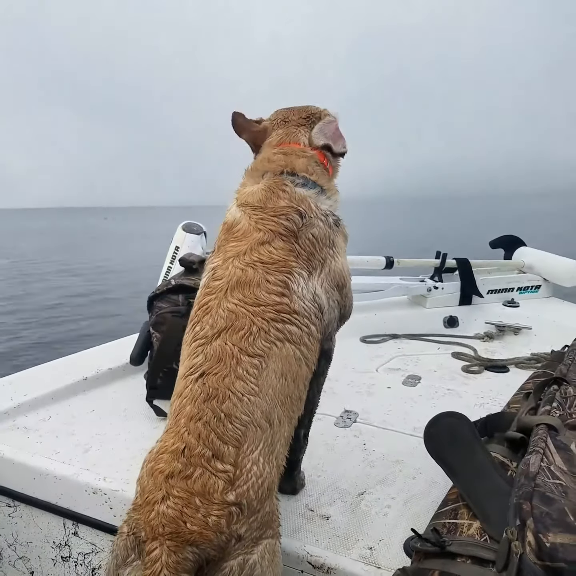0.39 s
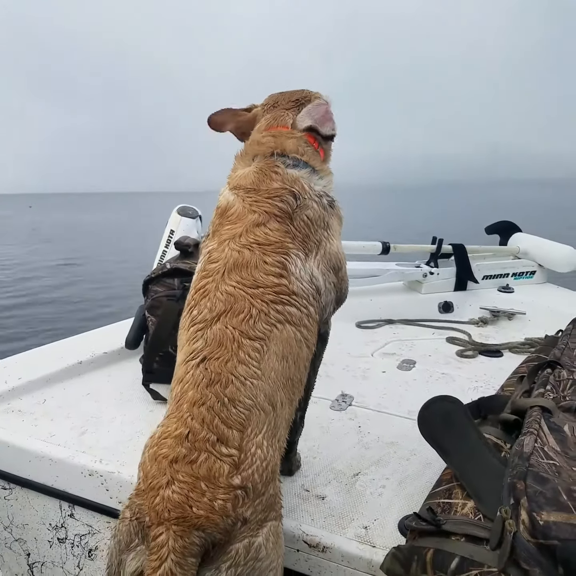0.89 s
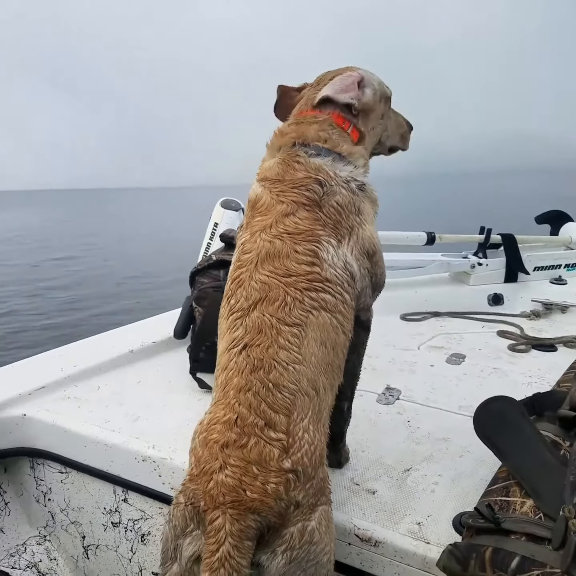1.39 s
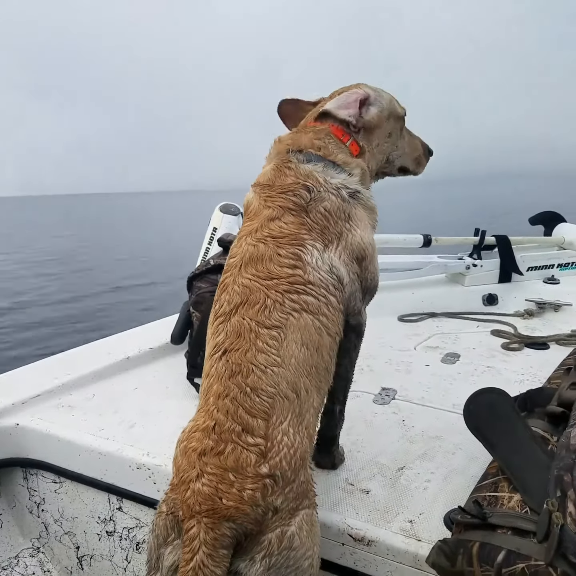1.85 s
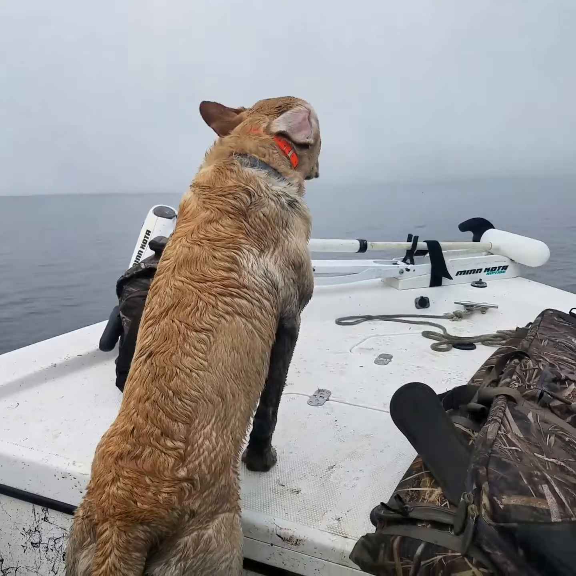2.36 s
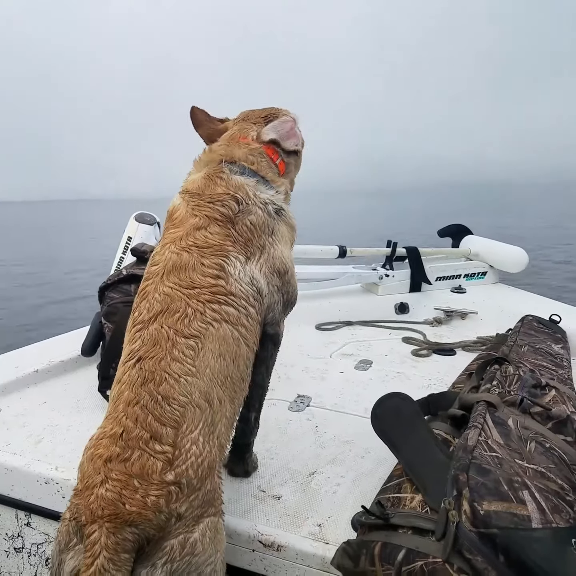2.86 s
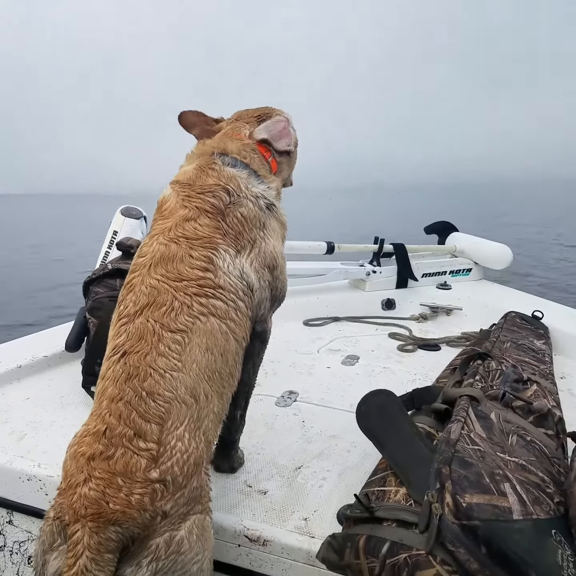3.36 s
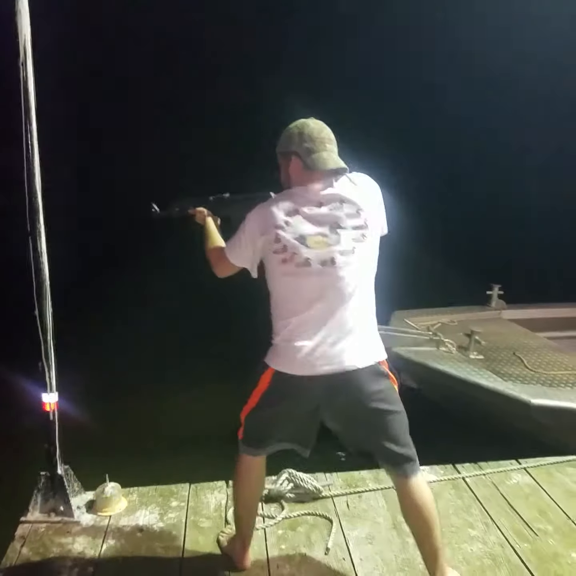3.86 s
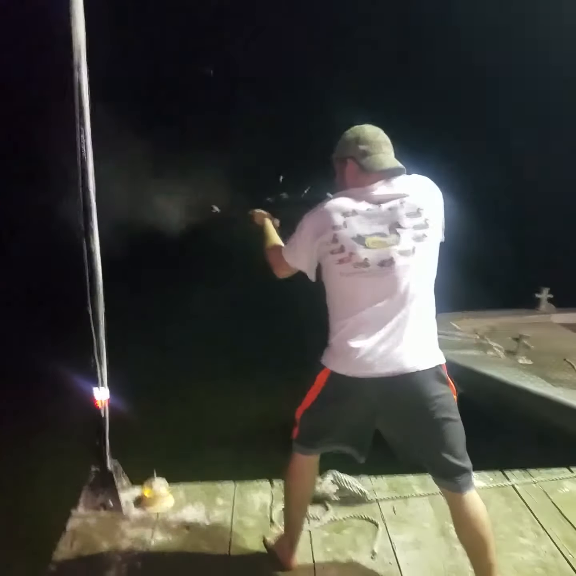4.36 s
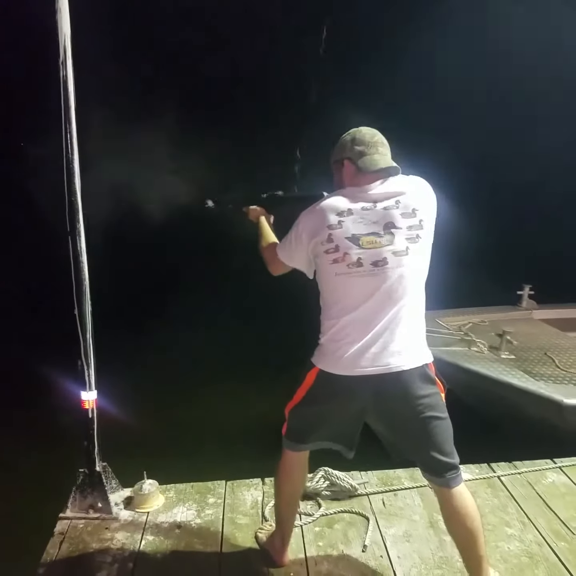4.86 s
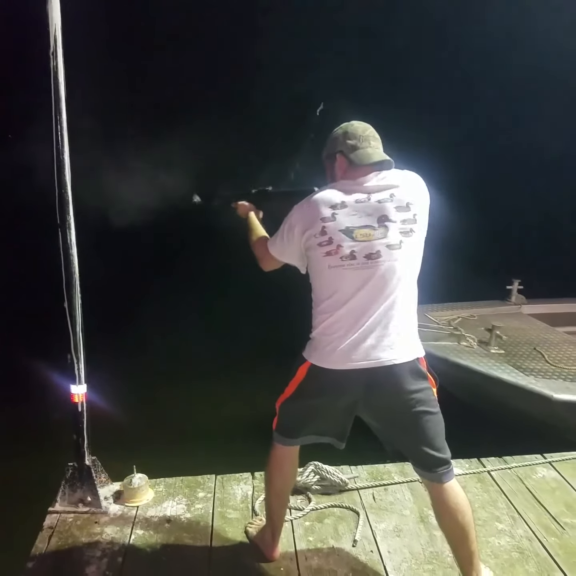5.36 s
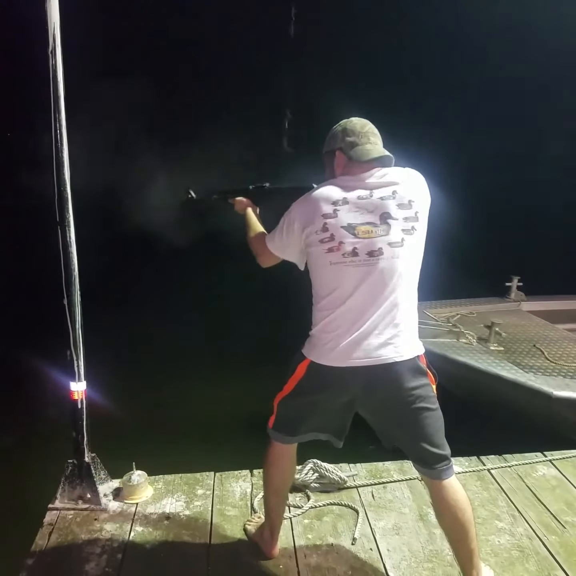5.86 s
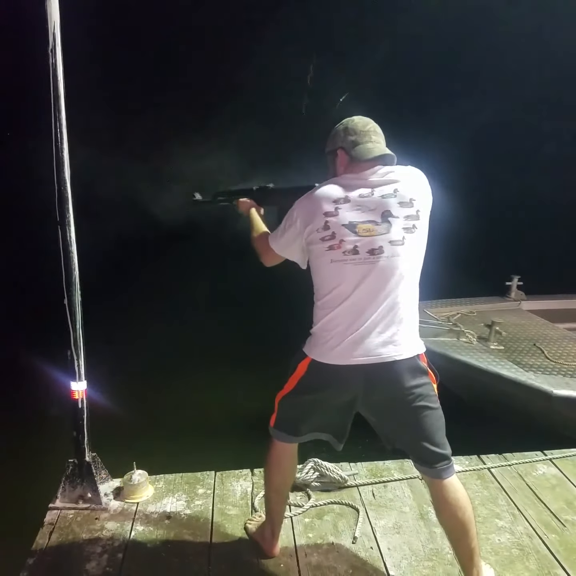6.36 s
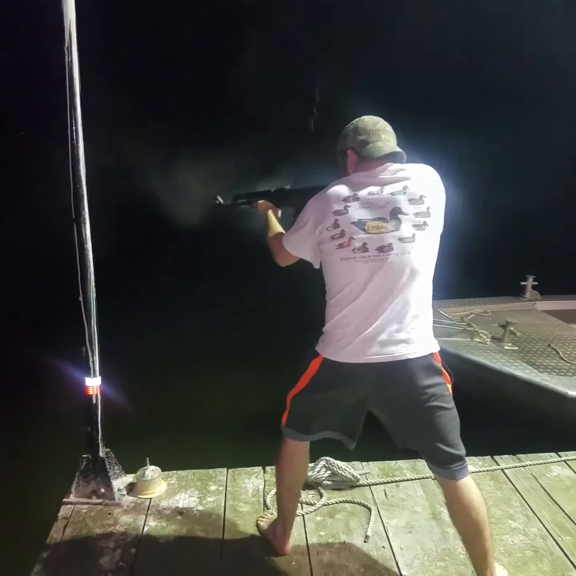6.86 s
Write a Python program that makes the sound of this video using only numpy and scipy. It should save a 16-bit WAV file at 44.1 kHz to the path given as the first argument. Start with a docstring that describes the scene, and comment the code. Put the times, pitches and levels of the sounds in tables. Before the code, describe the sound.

Strong wind roars and buffets the microphone on a boat, cuts to near silence, then an automatic rifle fires a long, loud, overloaded burst.

```python
"""Wind tears past the two microphone ports of a small camera on a fast open boat: gusts, lulls and buffets of
coloured noise kicks, and ringing slaps. Apart from the wind, band noise near 11 kHz goes on and off. A cut to
silence; then, on a dock at night, a light breeze puffs (sparse bass kicks), with faint tones and ticks, until an
automatic rifle fires about ten shots a second: harsh noise bursts in seven bands, ringing clatter of the action,
low ringing thumps, and noise echoes that thicken to a roar over a low rumble."""
import sys
import numpy as np
from scipy import signal
from scipy.fft import rfft, irfft
from scipy.io import wavfile
from scipy.ndimage import uniform_filter1d

SR = 44100
rng = np.random.default_rng(int(sys.argv[2]) if len(sys.argv) > 2 else 0)


def convert_level_to_amplitude(level_db):
    """Map a level in decibels to its linear amplitude factor."""
    exponent = np.asarray(level_db, float) / 20
    return 10 ** exponent


def dump(signal):
    """Clip the signal to [-1, 1] and save it as 16-bit WAV at the path in sys.argv[1]."""
    limited = np.clip(np.atleast_2d(signal).T, -1, 1)
    pcm = np.round(limited * 32767).astype(np.int16)
    wavfile.write(sys.argv[1], SR, pcm)


N = 308009
T_S = np.arange(N) / SR


def rms_one(x):
    """Scales to rms 1."""
    return x / np.sqrt(np.mean(x ** 2) + 1e-20)


def in_time(rows):
    """Interpolates table columns over time."""
    s, *columns = np.transpose(rows)
    return [np.interp(T_S, s, c) for c in columns]


def lasting(rows):
    """True between the first and last times of a table."""
    return (T_S > rows[0][0]) & (T_S < rows[-1][0])


def left_right(db):
    """Splits a left minus right difference evenly over the ports."""
    return db * np.array([[.5], [-.5]])


def ages(length_s):
    """Time in s since an onset."""
    return np.arange(round(length_s * SR)) / SR


def drift(rate_hz):
    """Two random curves of joint rms 1: noise through a double one-pole lowpass."""
    r = np.exp(-2 * np.pi * rate_hz / SR)
    noise = rng.standard_normal((2, N + 9000))
    return rms_one(signal.lfilter([1], [1, -2 * r, r * r], noise)[:, 9000:])


def colour(x, spectrum, size=4096, unit_power=True):
    """Causal (minimum phase) filter with the given spectrum; with unit_power white noise keeps its power."""
    hz, db = np.transpose(spectrum)
    grid = np.arange(size // 2 + 1) * SR / size
    cepstrum = irfft(np.interp(np.log(grid + 1), np.log(hz), db) * np.log(10) / 20)
    cepstrum[1:size // 2] *= 2
    cepstrum[size // 2 + 1:] = 0
    taps = irfft(np.exp(rfft(cepstrum)))
    if unit_power:
        taps = taps / np.sqrt(np.sum(taps ** 2))
    return signal.oaconvolve(x, taps[None], axes=1)[:, :N]


def band(x, low_hz, high_hz):
    """Butterworth bandpass."""
    return signal.sosfilt(signal.butter(2, [low_hz, high_hz], "band", fs=SR, output="sos"), x)


def highpass(x, order, hz):
    """Butterworth highpass."""
    return signal.sosfilt(signal.butter(order, hz, "high", fs=SR, output="sos"), x)


def spikes(times_s, heights):
    """One-sample clicks over a negligible floor."""
    out = np.zeros(N)
    np.add.at(out, np.minimum((np.asarray(times_s) * SR).astype(int), N - 1), heights)
    return out + 1e-18


def ring(clicks, hz, t60_s):
    """A unit click sets a sine of initial height 1 ringing."""
    r, w = convert_level_to_amplitude(-60 / (t60_s * SR)), 2 * np.pi * hz / SR
    return signal.lfilter([0, np.sin(w)], [1, -2 * r * np.cos(w), r * r], clicks)


def fading(clicks, t60_s):
    """Each click starts an exponential decay."""
    return signal.lfilter([1], [1, -convert_level_to_amplitude(-60 / (t60_s * SR))], clicks)


def late_right(x):
    """The right port hears the same sound slightly later."""
    lag_s = 0.0003
    return np.array([x, np.interp(np.arange(N) - lag_s * SR, np.arange(N), x)])


def eddies(per_s, spread_db, smooth):
    """Pressure kicks of small eddies, unrelated at the two ports, on a share of even noise."""
    strength_db = spread_db * np.minimum(rng.exponential(1, (2, N)), 4)
    kicks = (rng.random((2, N)) < per_s / SR) * convert_level_to_amplitude(strength_db)
    kicks *= rng.choice([-1, 1], (2, N))
    return rms_one(kicks) + smooth * rng.standard_normal((2, N))


def patchy(x, low_hz, high_hz, depth_db, rate_hz, together):
    """Ten narrow bands each waver on their own, at both ports together or apart."""
    out, edges_hz = x, np.geomspace(low_hz, high_hz, 11)
    for low, high in zip(edges_hz, edges_hz[1:]):
        part = signal.sosfilt(signal.butter(1, [low, high], "band", fs=SR, output="sos"), x)
        waver = drift(rate_hz)
        waver = waver[0] if together else waver
        out = out + (convert_level_to_amplitude(depth_db * waver) - 1) * part
    return out


# shots: t/s, relative level/dB
SHOT_ROWS = [(4.167, -2), (4.26, -4), (4.362, -4), (4.464, -6.5), (4.563, -5.5), (4.667, -6), (4.769, -6.5),
             (4.865, -7), (4.96, -5), (5.058, -5.5), (5.156, -7.5), (5.255, -4.5), (5.351, -7.5),
             (5.459, -6), (5.556, -6.5), (5.655, -5), (5.754, -5), (5.85, -5), (5.945, -6), (6.041, -6),
             (6.134, -5), (6.242, -5.5), (6.338, -5), (6.435, -6), (6.532, -6.5), (6.621, -5.5),
             (6.721, -5), (6.818, -4), (6.914, -6)]
# blast noise spectrum: f/Hz, density/dB
BLAST_SPECTRUM = [(25, -38.5), (130, -18.5), (250, -7), (460, -8.5), (700, -3.5), (1100, -11.5),
                  (1600, -7.5), (1950, -1), (2150, -5.5), (2400, -9.5), (3900, -10.5), (4550, -13.5),
                  (5300, -17), (5800, -14), (6400, -17), (11500, -17), (15000, -24.5)]
# blast bands: low f/Hz, high f/Hz, gain/dB, swell time factor, t60/s, relative echo level/dB,
# left-right likeness (power share), burst length/s, drop after burst/dB, first-shot offset/dB
BLAST_BAND_ROWS = [(30.2, 190, -0.5, 0.83, 0.85, -14.5, 0.9, 0.044, 2, 3),
                   (286, 670, 6.5, 4, 1, -11.5, 0.56, 0.045, 6.5, -1),
                   (870, 1834, 6, 1.13, 0.72, -13, 0.22, 0.038, 5.5, 0),
                   (1873, 2905, 6.5, 1.1, 0.41, -13.5, 0.27, 0.041, 0.5, -1.5),
                   (2930, 4560, 7.5, 1.44, 0.29, -11.5, 0.055, 0.036, 0, -1.4),
                   (5020, 7620, 6.5, 1.7, 0.36, -9.5, 0.2, 0.035, 2.2, -1),
                   (7680, 21000, 9, 1, 0.4, -10, 0.012, 0.027, 6, 2.5)]


def blasts():
    """Each shot swells, holds, drops and dies at each band's pace; far echoes of all shots pile into a roar."""
    first_swell_s, swell_s = 0.00074, 0.0095   # the first cracks out of the quiet
    burst_edge_s, echo_t60_s, top_right_db = 0.0014, 6.75, 0.5
    noise = colour(eddies(per_s=2000.0, spread_db=2.5, smooth=0.97), BLAST_SPECTRUM)
    common_noise = colour(rng.standard_normal((1, N)), BLAST_SPECTRUM)[0]
    s, level_db = np.transpose(SHOT_ROWS)
    first = s == s[0]
    swells_s = np.where(first, first_swell_s, swell_s)
    age, out = ages(.6), 0
    for low_hz, high_hz, db, slower, t60_s, echo_db, alike, burst_s, drop_db, first_db in BLAST_BAND_ROWS:
        # power envelopes: dB doubled
        power = np.zeros(N + len(age))
        heights = convert_level_to_amplitude(2 * (level_db + first_db * first))
        drop = drop_db / (1 + np.exp((burst_s - age) / burst_edge_s))
        fall = convert_level_to_amplitude(-120 * age / t60_s - 2 * drop)
        rises_s = np.maximum(swells_s * slower, 1e-4)
        for i, height, rise_s in zip((s * SR).astype(int), heights, rises_s):
            power[i:i + len(age)] += height * (1 - np.exp(-age / rise_s)) ** 2 * fall
        roar = fading(spikes(s, convert_level_to_amplitude(2 * (echo_db - 11))), echo_t60_s / 2)
        roar = uniform_filter1d(roar, size=3000, origin=1499)   # echoes set in gradually
        apart = np.sqrt(1 - alike) * band(noise, low_hz, high_hz)
        shared = np.sqrt(alike) * late_right(band(common_noise, low_hz, high_hz))
        pair = (apart + shared) * convert_level_to_amplitude(left_right(-top_right_db * (low_hz > 7000)))
        flutter_db = 0.2 * drift(30.0)[0] + 1.01 * drift(57.0)
        out = out + convert_level_to_amplitude(db + flutter_db) * np.sqrt(power[:N] + roar) * pair
    return out


# rifle action modes: f/Hz, relative level/dB, t60/s
ACTION_MODE_ROWS = [(1430, -31, .012), (1890, -29, .016), (2150, -27.5, .022), (2320, -32, .018),
                    (2705, -32, .016), (5760, -33, .02)]


def action():
    """After each shot the bolt makes six uneven contacts, striking the modes with varying strengths."""
    delay_s, span_s, chance_db = .01, .04, 3
    s, level_db = np.transpose(SHOT_ROWS)
    times_s = s[:, None] + delay_s + span_s * rng.random((len(s), 6))
    out = np.zeros((2, N))
    for hz, db, t60_s in ACTION_MODE_ROWS:
        per_shot_db = chance_db * rng.standard_normal((len(s), 1))
        for side in out:
            per_contact_db = chance_db * rng.standard_normal(times_s.shape)
            heights = convert_level_to_amplitude(level_db[:, None] + 13.0 + db + per_shot_db + per_contact_db)
            side += ring(spikes(times_s.ravel(), heights.ravel()), hz, t60_s)
    return out


def dips():
    """Gain: the roar sags just before each later shot, less as the echoes thicken."""
    half_s, depth_db, fill_s = 0.017, 3.5, 2.4
    s = np.transpose(SHOT_ROWS)[0]
    dip_db = depth_db * np.exp(-(s[1:] - s[0]) / fill_s)
    shape = np.hanning(round(2 * half_s * SR))
    return convert_level_to_amplitude(-np.convolve(spikes(s[1:] - 2.0 * half_s, dip_db), shape)[:N])


# low thumps: t/s, relative ring level/dB, relative push level/dB
THUMP_ROWS = [(4.2278, -9, -2), (4.3131, -5, 3.5), (4.5291, -3.5, -40), (4.6463, -6, -13),
              (4.738, -11, -35), (4.8392, -10, -39), (4.851, -16, -38), (4.953, -7.5, -37),
              (5.048, -14.5, -5), (5.1373, -9.5, -2.5), (5.2304, -10.5, -36), (5.3366, -8, -36),
              (5.4347, -8, -11), (5.5327, -5.5, -4), (5.632, -25.5, 0.5), (5.7498, -12, -12),
              (5.8232, -7, 4), (5.8402, -15, -28), (5.916, -22, -5), (5.9366, -8.5, -27), (6.022, -14, -16),
              (6.0292, -11.5, -26), (6.1165, -20, -30), (6.1202, -6.5, -39), (6.2265, -40, -1),
              (6.3116, -33, -4), (6.328, -11, -5), (6.3706, -16, -7), (6.4006, -11.5, -3),
              (6.4222, -8.5, -22), (6.5013, -39, -4.5), (6.5223, -9, -18), (6.602, -6.5, -2),
              (6.614, -13.5, -9), (6.686, -9.5, 2.5), (6.775, -27, 1), (6.7945, -10.5, -31),
              (6.8514, -16.5, -38.5), (6.8714, -15.5, -1), (6.889, -10.5, -31)]
# thump modes: nominal f/Hz, left gain/dB, right gain/dB, t60/s
THUMP_MODE_ROWS = [(482, 11, 10.5, 0.025), (311, -10, -2, 0.043), (776, -1, 1, 0.016), (1500, 2, 4, 0.0071)]


def thumps():
    """A soft pressure step rings modes of varying strength and pitch, and pushes a lower, slower swing."""
    push_hz, push_t60_s, rise_s = 204, 0.021, 0.00033
    pitch_spread, chance_db = .08, 1.5   # pitch_spread: log frequency
    after_db, after_t60_s, after_width_hz = -6.5, 0.13, 225
    s, ring_db, push_db = np.transpose(THUMP_ROWS)
    chance = rng.standard_normal((len(s), len(THUMP_MODE_ROWS) + 1))
    shifts = chance[:, -1]
    out = late_right(ring(spikes(s, convert_level_to_amplitude(push_db)), push_hz, push_t60_s))
    step = np.hanning(round(0.00074 * SR))   # the step takes a moment
    age = ages(.1)
    for (hz, left_db, right_db, t60_s), extra in zip(THUMP_MODE_ROWS, chance.T):
        rings = np.zeros(N + len(age))
        for i, db, shift in zip((s * SR).astype(int), ring_db + chance_db * extra, shifts):
            shape = (1 - np.exp(-age / rise_s)) * convert_level_to_amplitude(db - 60 * age / t60_s)
            shifted_hz = hz * np.exp(pitch_spread * shift)
            rings[i:i + len(age)] += np.sign(shift) * shape * np.sin(2 * np.pi * shifted_hz * age)
        softened = np.convolve(rings, step / step.sum())[:N]
        out += late_right(softened) * convert_level_to_amplitude([[left_db], [right_db]])
    # near echoes keep the main mode sounding
    fade = fading(spikes(s + 0.0049, convert_level_to_amplitude(ring_db + after_db)), after_t60_s)
    hz = THUMP_MODE_ROWS[0][0]
    echo_noise = band(rng.standard_normal(N), hz - after_width_hz / 2, hz + after_width_hz / 2)
    out += late_right(fade * rms_one(echo_noise))
    return highpass(out, 2, 110.0)


def ducking(thump, depth, release_s):
    """Gain control: falls as the smoothed thump level rises, then recovers."""
    r = np.exp(-1 / (release_s * SR))
    level = signal.lfilter([1 - r], [1, -r], np.abs(thump).mean(axis=0))
    return 1 / (1 + depth * level)


# lulls: half-recovered t/s, length/s, depth/dB, left extra fall minus right/dB
LULL_ROWS = [(0.183, 0.034, 4.5, -3), (0.462, 0.027, 7.5, 14), (0.654, 0.03, 5.5, 4), (0.749, 0.025, 9, 6),
             (0.955, 0.13, 4, 1.5), (1.082, 0.047, 12.5, 9), (1.186, 0.023, 3.5, 9),
             (1.401, 0.025, 7.5, -6), (1.519, 0.087, 5.5, 0), (1.636, 0.069, 7, -0.5),
             (1.79, 0.038, 8.5, -13), (1.848, 0.021, 17, 8), (1.955, 0.049, 13.5, 10), (2.031, 0.027, 9, 1),
             (2.152, 0.044, 10, 6), (2.212, 0.037, 8.5, 2), (2.375, 0.1, 11.5, 11.5), (2.409, 0.021, 23, 3),
             (2.641, 0.046, 7.5, 3), (2.803, 0.11, 10.5, 12.5), (2.877, 0.045, 13, 22.5),
             (2.981, 0.047, 10, 9.5), (3.06, 0.041, 10.5, 10), (3.143, 0.033, 12.5, 16),
             (3.237, 0.044, 13, 14), (3.308, 0.015, 4.5, -5), (3.4, 0.055, 1.5, 7.5),
             (3.551, 0.033, 8.5, 11), (3.632, 0.038, 15.5, 12)]


def lulls():
    """Loss in dB at each port: the wind sinks away, stays low and comes back fast."""
    sink_share, return_s = 0.35, 0.017
    loss_db = np.zeros((2, N))
    for end_s, length_s, depth_db, left_db in LULL_ROWS:
        sink = (T_S - end_s + length_s) / (length_s * sink_share)
        shape = np.clip(np.minimum(sink, (end_s - T_S) / return_s + .5), 0, 1)
        loss_db += shape * (depth_db + left_right(left_db))
    return loss_db


# wind between lulls: t/s, relative level/dB, left minus right/dB, treble re level/dB
WIND_ROWS = [(0.0, -17, 3.5, -16), (0.5, -19, -1.5, -15), (1.0, -15.5, 5.5, -15.5), (1.5, -15, 3, -19.5),
             (2.0, -17, 1.5, -14.5), (2.5, -14.5, 1.5, -16.5), (2.95, -15, 4.5, -15.5),
             (3.3, -19, 1, -23.5), (3.6, -18, 3, -21), (3.86, -18.5, 6.5, -20.5)]
# buffets: t/s, relative level/dB, left minus right/dB, treble re level/dB
BUFFET_ROWS = [(0.104, -24.5, -5, -3), (0.193, -23.5, -6, 2), (0.268, -20, -5, -10),
               (0.322, -12.5, 4, -9.5), (0.397, -11.5, 5, -18), (0.52, -14, 6, -23),
               (0.585, -7.5, -1, -16.4), (0.675, -14, 10, -17), (0.791, -11, -7, -21),
               (0.975, -13.5, 11, -9.5), (1.021, -16, -1, -39), (1.083, -13, -14, -22),
               (1.232, -22, 23, -15), (1.279, -17, -11, -7.5), (1.35, -23, -13, -12),
               (1.405, -21, -13, -10), (1.519, -16, -5, -12.5), (1.584, -15.5, -3, -9),
               (1.643, -27, -2, -6), (1.688, -37, 13, -4), (1.807, -8.5, 10, -20), (1.888, -8.5, 17, -20),
               (2.019, -13, 7, -37), (2.039, -25, -2, 7.5), (2.151, -20, 5, -27), (2.231, -7, 4, -11),
               (2.388, -13.5, 0, -24), (2.443, -19.5, 1, -7.5), (2.569, -15, 0, -17), (2.649, -27, 3, -14),
               (2.8, -7, -1.5, -12), (2.883, -9.5, -8, -29), (2.982, -25, 1, -29), (3.059, -8, 0, -12.5),
               (3.186, -16.5, 5, -6.5), (3.236, -25.5, 21, -12.5), (3.272, -21, 6, -10),
               (3.344, -27, 21, -9.5), (3.436, -19, 7.5, -18), (3.55, -5, 3.5, -13.5),
               (3.679, -21, -6, -11), (3.733, -11, -3, -12), (3.771, -7.5, 5, -16.5)]
# wind body spectrum: f/Hz, density/dB
WIND_BODY_SPECTRUM = [(88, -37.5), (150, -11), (254, -4.5), (284, -2), (352, 2), (684, -1), (746, -2),
                      (1160, -6.5), (3000, -29), (3900, -59.5), (6600, -120)]
# wind treble spectrum: f/Hz, density/dB
WIND_TREBLE_SPECTRUM = [(900, -33.5), (1500, -3), (3800, -15), (5800, -16), (6400, -20.5), (7000, -35.5),
                        (7600, -53.5), (16000, -69.5)]
# slow-eddy spectrum: f/Hz, density/dB
WIND_LOWS_SPECTRUM = [(15, -58.5), (25, -20.5), (89, -2), (200, -6), (260, -22.5), (440, -120)]


def wind():
    """Gusts and buffets set the strength of the eddy kicks at each port; the ports colour them."""
    rise_s, t60_s = 0.0022, 0.09
    tilt_db, tilt_rate_hz, tilt_split_hz = 1, 15, 590
    dulling, lows_db = 0.041, -30   # dulling: extra treble dB lost per lull dB
    flecks_per_s, flecks_db = 240, -10.5
    level_db, pan_db, treble_db = in_time(WIND_ROWS)
    loss_db = lulls()
    port_db = level_db + left_right(pan_db) - loss_db + 2.9 * drift(62.0) + 0.7 * drift(110.0)
    gust = lasting(WIND_ROWS) * convert_level_to_amplitude(port_db)
    surge, crackle, age = np.zeros((2, N)), np.zeros((2, N)), ages(t60_s)
    shape = (1 - np.exp(-age / rise_s)) * convert_level_to_amplitude(-60 * age / t60_s)
    for s, buffet_db, side_db, bright_db in BUFFET_ROWS:
        i = round(s * SR)
        push = convert_level_to_amplitude(buffet_db + left_right(side_db)) * shape
        surge[:, i:i + len(age)] += push
        crackle[:, i:i + len(age)] += push * convert_level_to_amplitude(bright_db)
    kicks = eddies(per_s=900.0, spread_db=3.5, smooth=0.52)
    fizz = kicks + 0.83 * rng.standard_normal((2, N))
    body = colour(kicks * (gust + surge), WIND_BODY_SPECTRUM)
    # small and large eddies take turns
    small = highpass(body, 1, tilt_split_hz)
    tilt = convert_level_to_amplitude(tilt_db * drift(tilt_rate_hz))
    body = small * tilt + (body - small) / tilt
    bright = gust * convert_level_to_amplitude(treble_db - dulling * loss_db + 2.0 * drift(9.5)) + crackle
    spray = convert_level_to_amplitude(-43.0 + 2.5 * drift(3.2)) * rng.standard_normal((2, N))   # far hiss fills the lulls
    treble = colour(fizz * bright + spray, WIND_TREBLE_SPECTRUM)
    # lone sharp flecks in the gusts
    flecks = bright * eddies(flecks_per_s, spread_db=4.5, smooth=0)
    flecks = convert_level_to_amplitude(flecks_db) * band(band(flecks, 1300.0, 4500.0), 1300.0, 4500.0)
    # large slow eddies follow the gusts only in part
    slow_db = lows_db + 0.43 * (port_db + 19.5) + left_right(4.4)
    slow = rng.standard_normal((2, N)) * lasting(WIND_ROWS) * convert_level_to_amplitude(slow_db)
    return body + treble + flecks + colour(slow, WIND_LOWS_SPECTRUM)


# hard eddies: t/s, relative peak level/dB, ring f/Hz, left minus right/dB
SLAP_ROWS = [(0.051, -7, 600, 0.0), (0.098, -10, 463, 0.5), (0.139, -9, 563, 5.5), (0.331, -6, 668, 5.5),
             (0.358, -10, 716, -2.0), (0.401, -6, 756, 2.0), (0.575, -8, 783, 1.5), (0.603, -5, 452, -2.5),
             (0.797, -4, 487, 1.0), (0.823, -8, 404, 2.5), (0.853, -8, 503, 3.5), (0.949, -9, 447, 3.0),
             (1.027, -5, 493, 5.0), (1.084, -9, 441, -1.0), (1.275, -5, 708, 0.5), (1.397, -8, 498, 4.5),
             (1.496, -11, 659, 1.5), (1.521, -7, 624, 3.5), (1.587, -8, 503, 2.5), (1.64, -8, 487, -0.5),
             (1.69, -6, 813, 0.0), (1.714, -8, 519, 4.5), (1.81, -3, 606, 1.5), (1.859, -11, 589, 0.5),
             (1.892, -5, 436, 3.5), (1.955, -12, 589, 6.0), (1.977, -9, 439, 5.0), (2.024, -8, 509, 4.5),
             (2.153, -10, 538, 4.5), (2.218, -10, 396, 3.0), (2.447, -7, 684, 2.0), (2.48, -8, 614, 3.0),
             (2.521, -7, 579, 3.0), (2.64, -7, 458, 5.0), (2.802, -4, 544, 0.0), (2.88, -6, 686, -1.5),
             (2.983, -10, 433, 4.5), (2.999, -5, 482, 0.0), (3.058, -4, 762, 0.0), (3.152, -12, 705, 2.5),
             (3.189, -6, 501, -1.0), (3.239, -9, 552, 3.5), (3.442, -4, 668, 0.0), (3.552, -5, 458, 1.0),
             (3.64, -12, 544, 6.0), (3.686, -5, 440, 0.0), (3.726, -9, 452, -1.5), (3.739, -7, 800, 0.0),
             (3.78, -7, 480, 0.0), (3.826, -9, 719, 6.0)]


def slaps():
    """Each hard eddy rings both ports for a few cycles."""
    t60_cycles, rise_s = 8.0, .0012
    out, age = np.zeros((2, N)), ages(.04)
    for s, peak_db, hz, side_db in SLAP_ROWS:
        i = round(s * SR)
        shape = (1 - np.exp(-age / rise_s)) * convert_level_to_amplitude(-60 * age * hz / t60_cycles)
        wave = np.sin(2 * np.pi * hz * age) * shape
        wave = wave * convert_level_to_amplitude(peak_db) / np.abs(wave).max()
        out[:, i:i + len(age)] += wave * convert_level_to_amplitude(left_right(side_db)) * rng.choice([-1, 1])
    return out


# on/off noise patches near 11 kHz: start t/s, length/s, relative level/dB, centre f/Hz
PATCH_ROWS = [(0.091, 0.049, -51, 10900), (0.181, 0.072, -57, 10800), (0.312, 0.038, -50, 11800),
              (0.508, 0.042, -58, 11500), (0.576, 0.039, -62, 10800), (0.658, 0.057, -57, 10800),
              (0.956, 0.058, -46, 10800), (1.07, 0.049, -59, 10800), (1.18, 0.029, -60, 11000),
              (1.229, 0.086, -51, 11200), (1.341, 0.031, -54, 11400), (1.518, 0.031, -61, 11800),
              (1.618, 0.039, -55, 10600), (1.658, 0.045, -57, 10400), (1.746, 0.029, -56, 10900),
              (1.794, 0.057, -61, 11500), (1.886, 0.058, -53, 10800), (1.938, 0.082, -60, 11300),
              (2.023, 0.052, -47, 10900), (2.094, 0.077, -57, 10900), (2.212, 0.067, -52.5, 10800),
              (2.338, 0.045, -62, 10900), (2.43, 0.051, -49, 10800), (2.558, 0.06, -52, 11000),
              (2.643, 0.045, -55, 10600), (2.79, 0.043, -47.5, 10800), (2.863, 0.043, -56, 11400),
              (2.983, 0.036, -61, 10300), (3.051, 0.047, -50, 10500), (3.176, 0.081, -51.5, 11300),
              (3.434, 0.031, -56, 11300), (3.54, 0.057, -54, 10600), (3.711, 0.041, -59, 10300),
              (3.77, 0.039, -60, 10600)]


def high_band_patches():
    """Band noise near 11 kHz goes on and off while the wind plays, but is no part of it."""
    edge_s, width_hz = .012, 2200
    out = np.zeros((2, N))
    noise = eddies(per_s=500.0, spread_db=4.0, smooth=0.8) * convert_level_to_amplitude(3.0 * drift(40.0)[0])
    for s, length_s, db, hz in PATCH_ROWS:
        i, age = round(s * SR), ages(length_s)
        piece = slice(i, i + len(age))
        shape = np.clip(np.minimum(age, length_s - age) / edge_s, 0, 1) ** 2
        low_hz, high_hz = hz - width_hz / 2, hz + width_hz / 2
        patch = rms_one(band(band(noise[:, piece], low_hz, high_hz), low_hz, high_hz))
        out[:, piece] += convert_level_to_amplitude(db + 8.0) * shape * patch
    return out


# low rumble under the firing: t/s, relative level/dB
RUMBLE_ROWS = [(4.17, -48.5), (4.2, -22), (4.29, -30), (4.69, -40), (5.2, -41), (5.56, -21.5),
               (5.79, -17.5), (6.6, -20), (6.98, -19.5)]


def rumble():
    """Low echoes roll about under the firing, renewed by each thump."""
    steady, t60_s = 0.73, 0.064
    level_db, = in_time(RUMBLE_ROWS)
    left, right, common = band(rng.standard_normal((3, N)), 81.0, 300.0)
    s, _, push_db = np.transpose(THUMP_ROWS)
    beat = fading(spikes(s, convert_level_to_amplitude(push_db / 2)), t60_s)
    firing = (T_S > SHOT_ROWS[0][0]) * (steady + beat)
    noise = rms_one(1.5 * np.array([left, right]) + late_right(common))
    return firing * convert_level_to_amplitude(level_db + 2.0 * drift(26.0)[0]) * noise


# dock breeze: t/s, relative level/dB, left minus right/dB
BREEZE_ROWS = [(4.021, -31, -10), (4.11, -33, -2), (4.142, -26, -20), (4.16, -44, 4)]
# breeze spectrum: f/Hz, density/dB
BREEZE_SPECTRUM = [(15, -62), (25, -34), (44, -24), (91, -3), (144, -6.5), (177, -8.5), (257, -11),
                   (599, -17), (1190, -32), (5840, -35), (7610, -68), (10700, -30.5), (14000, -55)]


def breeze():
    """Light air before the first shot: sparse soft kicks in the bass over a faint hiss."""
    level_db, pan_db = in_time(BREEZE_ROWS)
    gain = lasting(BREEZE_ROWS) * convert_level_to_amplitude(level_db + left_right(pan_db) + 2.3 * drift(25.0))
    kicks = gain * eddies(per_s=300.0, spread_db=2.5, smooth=0.63)
    puffs = band(colour(kicks, BREEZE_SPECTRUM), 30.0, 984.0)
    hiss = band(colour(rng.standard_normal((2, N)), BREEZE_SPECTRUM), 950.0, 15000.0)
    before_firing = (T_S > BREEZE_ROWS[0][0]) & (T_S < SHOT_ROWS[0][0])
    return puffs + convert_level_to_amplitude(-34.0 + 1.6 * drift(30.0)) * hiss * before_firing


# dock ticks: t/s, relative rustle level/dB, relative bass bump level/dB
TICK_ROWS = [(4.042, -38, -29), (4.078, -55, -30), (4.134, -50, -20), (4.138, -41, -33)]


def ticks():
    """A short bright noise rustle with a soft ringing bump under it."""
    s, rustle_db, bump_db = np.transpose(TICK_ROWS)
    fade = fading(spikes(s, convert_level_to_amplitude(rustle_db)), t60_s=0.045)
    rustle = fade * rms_one(band(rng.standard_normal((2, N)), 2700.0, 5800.0))
    bump = ring(spikes(s, convert_level_to_amplitude(bump_db)), hz=340, t60_s=0.036)
    return rustle + bump * convert_level_to_amplitude(left_right(-5))


# faint low tones: start t/s, length/s, from f/Hz, to f/Hz, relative level/dB
MOAN_ROWS = [(4.022, .04, 122, 122, -27), (4.045, 0.069, 150, 285, -34), (4.118, .036, 170, 230, -33)]


def moans():
    """Each sine swells and fades, steady or sliding up, nearer the right port."""
    out = np.zeros(N)
    for s, length_s, from_hz, to_hz, db in MOAN_ROWS:
        i, n = round(s * SR), round(length_s * SR)
        phase = 2 * np.pi * np.cumsum(np.linspace(from_hz, to_hz, n)) / SR
        out[i:i + n] += convert_level_to_amplitude(db) * np.hanning(n) ** .5 * np.sin(phase)
    return out * convert_level_to_amplitude(left_right(-5))


def scene():
    """Boat wind to an abrupt cut, then the dock and the firing."""
    cut_s, fade_s = 3.839, .003
    thump = thumps()
    boat = patchy(wind(), 200.0, 3760.0, depth_db=3, rate_hz=13.6, together=False) + slaps()
    before_cut = (boat + high_band_patches()) * np.clip((cut_s - T_S) / fade_s, 0, 1)
    dock = breeze() + ticks() + moans()
    fire = patchy(blasts(), 635.0, 7800.0, depth_db=2, rate_hz=17.7, together=True) + action()
    fire = fire * dips() * ducking(thump, depth=1.9, release_s=0.051)
    return before_cut + dock + fire + thump + rumble()


def low_pass(x):
    """Removes everything above the highest recorded frequency."""
    return signal.sosfilt(signal.butter(12, 14600, fs=SR, output="sos"), x)


# camera sound path: f/Hz, gain/dB
PORT_RESPONSE = [(20, -7), (60, -3), (110, -0.87), (6300, -0.2), (7400, -1.5), (8300, -14), (9200, -12.5),
                 (9900, -4), (14100, -3.5)]


def record(dry):
    """The microphone overloads on peaks, the sound path colours it, the top is cut."""
    cutoff_hz = 13950
    overloaded = 1.007 * np.tanh(dry / 1.22)
    coloured = colour(overloaded, PORT_RESPONSE, unit_power=False)
    lowpass = signal.ellip(10, .5, 70, cutoff_hz, fs=SR, output="sos")
    mix = np.clip(signal.sosfilt(lowpass, coloured), -1, 1)
    return low_pass(mix)


dry = scene()
out = record(dry)
dump(out)
```